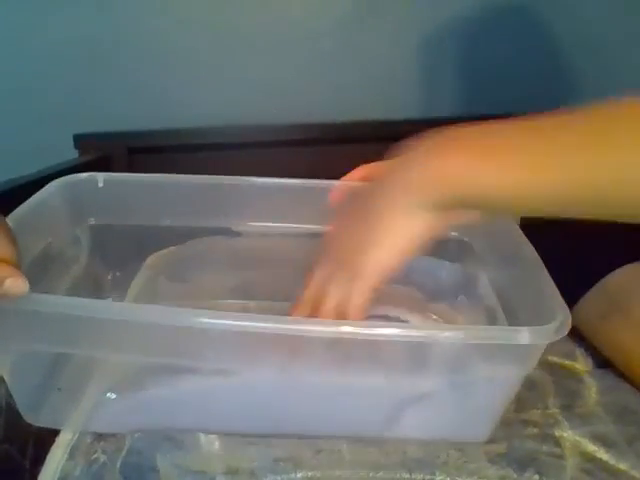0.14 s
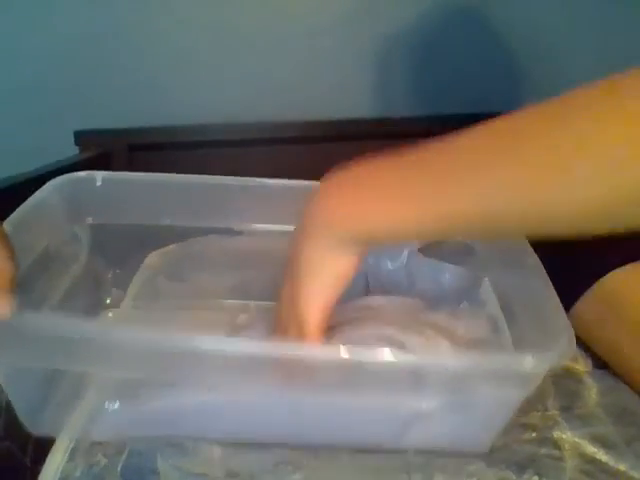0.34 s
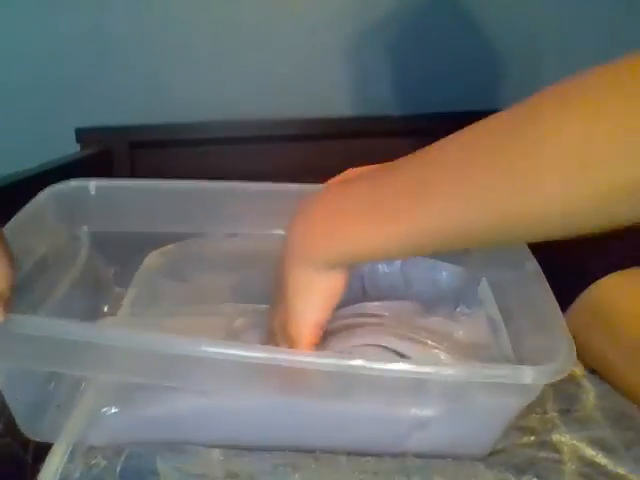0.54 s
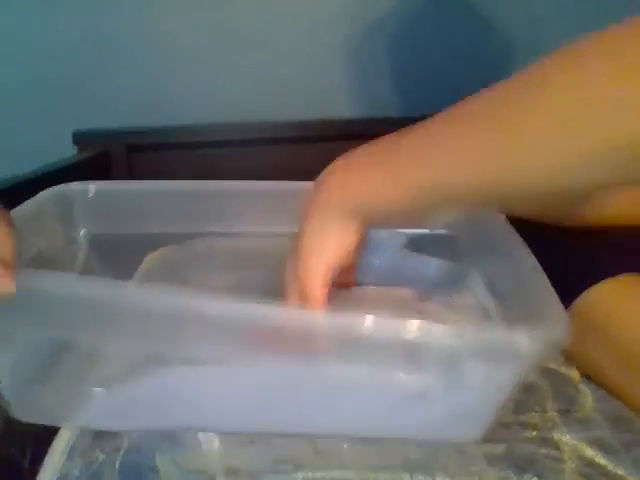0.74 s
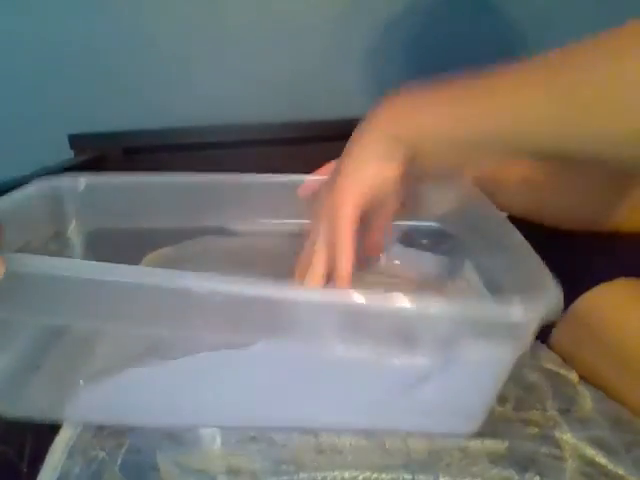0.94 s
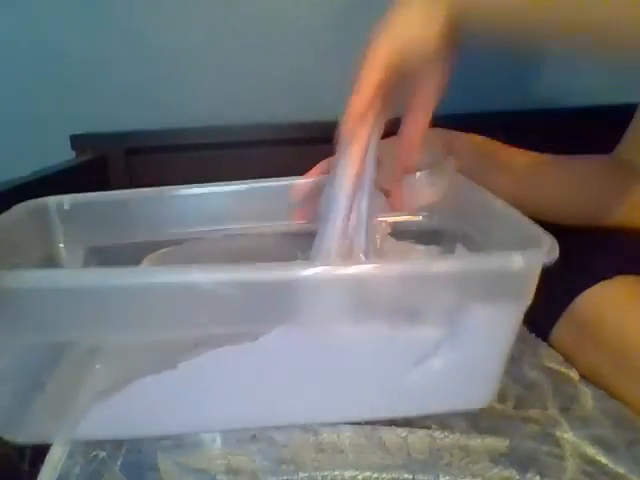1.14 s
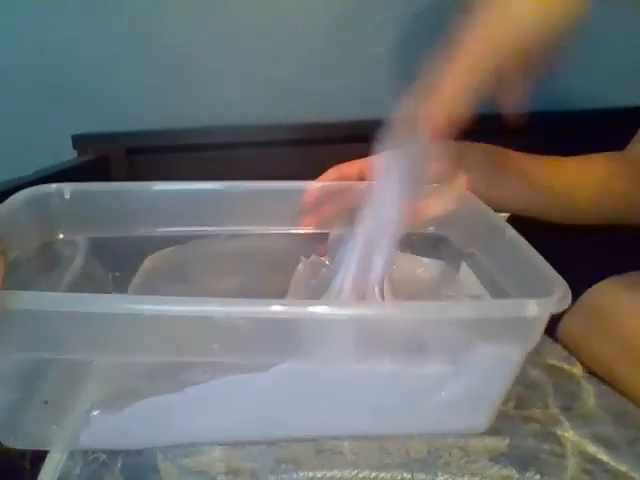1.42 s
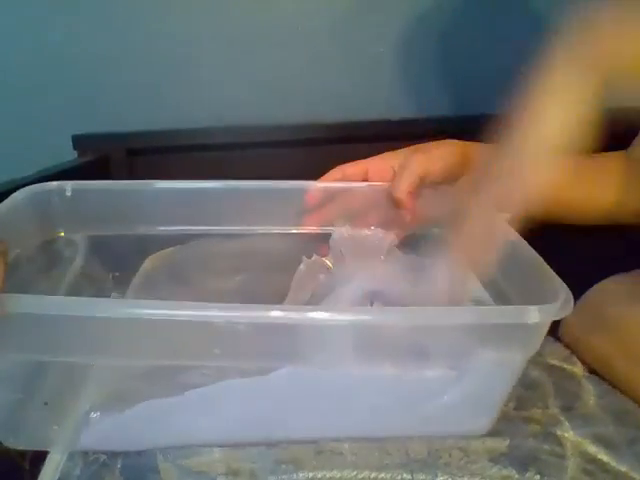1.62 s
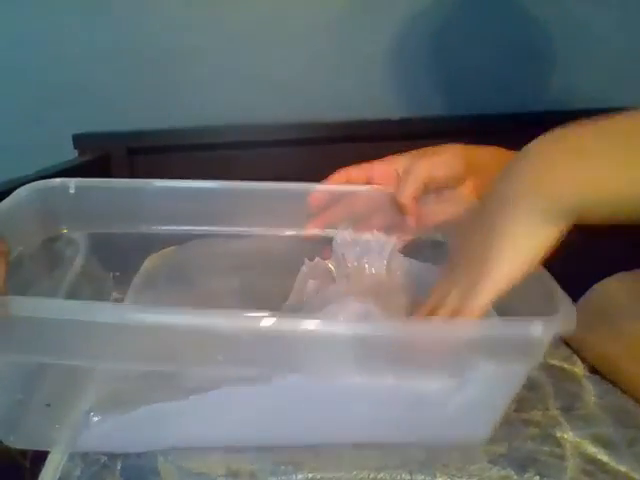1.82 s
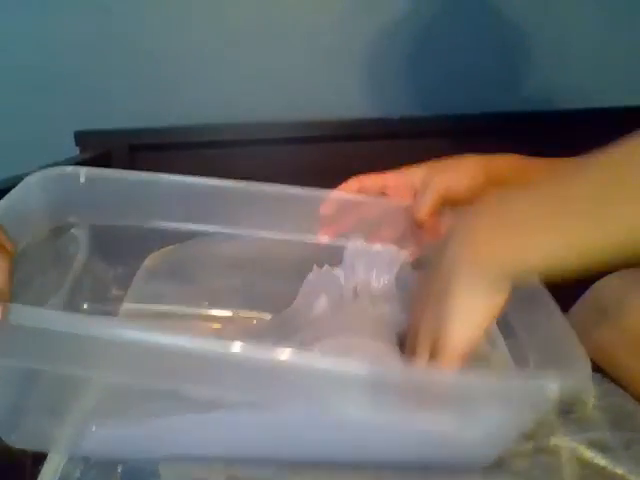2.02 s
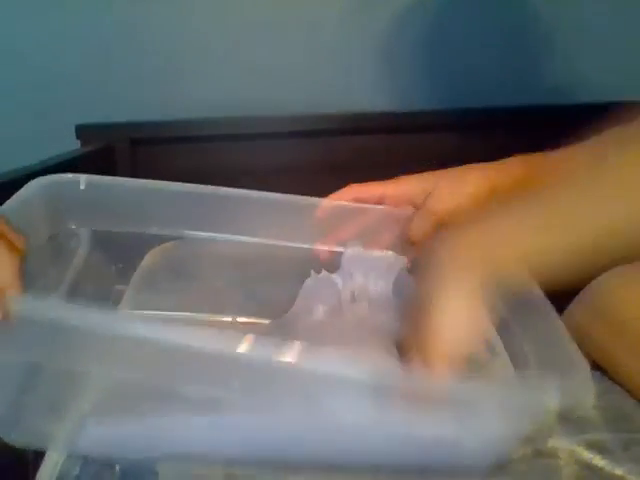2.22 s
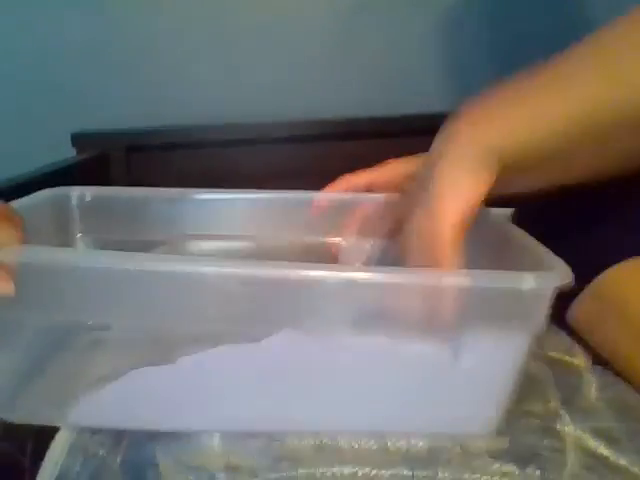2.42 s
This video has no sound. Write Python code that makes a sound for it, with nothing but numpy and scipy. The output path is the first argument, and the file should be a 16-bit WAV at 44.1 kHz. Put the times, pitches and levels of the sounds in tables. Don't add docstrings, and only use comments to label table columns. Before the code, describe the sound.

Slime is kneaded in a plastic tub, close up in a small bedroom. Faint wet crackles and little pops come first, with squelching around 0.7 s. Sharp snaps and hollow pops burst at 0.98 and 1.04 s. It then quietens until soft squelches near 2.1 s and loud snapping clusters at 2.4 to 2.5 s. Dull knocks, low thuds, rumble and steady hiss run beneath.

```python
import sys
import numpy as np
from scipy import signal
from scipy.fft import rfft, irfft
from scipy.io import wavfile
from scipy.ndimage import uniform_filter1d

SR = 44100
rng = np.random.default_rng(int(sys.argv[2]) if len(sys.argv) > 2 else 0)


def file_out(sig):
    cols = np.atleast_2d(sig).T
    lim = np.clip(cols, -1, 1)
    pcm = np.round(lim * 32767).astype(np.int16)
    wavfile.write(sys.argv[1], SR, pcm)


def level_to_linear(level):
    exponent = np.asarray(level, float) / 20
    return 10 ** exponent


N = 112454


def evened(x):
    return x / np.sqrt(np.mean(x ** 2) + 1e-20)


def coloured_noise(points):
    hz, db = np.transpose(points)
    f = np.fft.rfftfreq(N, 1 / SR)
    gain = level_to_linear(np.interp(np.log(f + 1), np.log(hz + 1), db))
    return evened(irfft(rfft(rng.standard_normal(N)) * gain, N))


def add(mix, start_s, sound):
    part = mix[round(start_s * SR):][:len(sound)]
    part += sound[:len(part)]


def resonate(x, hz, width_hz):
    turn = np.exp(2j * np.pi * hz * np.arange(len(x)) / SR)
    r = np.exp(-np.pi * width_hz / SR)
    return 2 * (turn * signal.lfilter([1 - r], [1, -r], x / turn)).real


def resonate_twice(x, hz, width_hz):
    return resonate(resonate(x, hz, width_hz), hz, width_hz)


def dying_sines(modes, t, sign=1):
    t = np.maximum(t, 0)
    out = np.zeros(len(t))
    for k, (hz, db, t60_s) in enumerate(modes):
        out += sign ** k * level_to_linear(db - 60 * t / t60_s) * np.sin(2 * np.pi * hz * t)
    return out


def ringing_bodies(table, rough, rise_s):
    wobble_hz = 260
    t, out = np.arange(8192) / SR, np.zeros(N)
    for (start_s, db, hz, ring_ms), noise in zip(table, rng.standard_normal((len(table), 8192))):
        wobble = evened(resonate_twice(noise, hz, wobble_hz))
        tone = np.sin(2 * np.pi * hz * t) + rough * wobble
        decay = level_to_linear(db - 60 * t / (ring_ms / 1000))
        add(out, start_s, (1 - np.exp(-t / rise_s)) * decay * tone)
    return out


# (frequency [Hz], density [dB per Hz])
HISS_SPECTRUM = [(88, -54), (150, 7.5), (1480, -5.5), (1830, -4), (2180, -5.5), (5910, -11.5),
                 (13400, -7.5), (16000, -4)]


def microphone_hiss():
    return level_to_linear(-52.5) * coloured_noise(HISS_SPECTRUM)


# (time [s], signed pressure [full scale], width [s])
BED_SWAYS = [(.37, -0.026, .02), (.55, -0.026, 0.034), (.65, 0.023, 0.021), (0.829, 0.029, 0.046),
             (1.16, -0.025, 0.017), (1.782, -0.015, 0.026), (1.85, 0.033, 0.029), (1.97, -0.032, 0.025),
             (2.152, -.035, 0.012), (2.221, 0.049, 0.015), (2.397, 0.049, 0.021), (2.44, -0.072, 0.032),
             (2.545, 0.044, 0.015)]
# (frequency [Hz], level [dB])
RUMBLE_SPECTRUM = [(4, -5.5), (8, -2), (16, -9), (35, -21.5), (70, -24.5), (110, -27.5), (200, -38.5),
                   (400, -50)]


def bedding():
    t = np.arange(N) / SR
    bumps = np.zeros(N)
    for peak_s, pressure, width_s in BED_SWAYS:
        bumps += pressure * np.exp(-((t - peak_s) / width_s) ** 2)
    return bumps + level_to_linear(-40) * coloured_noise(RUMBLE_SPECTRUM)


# (time [s], level [dB], pitch [Hz], ring [ms])
TUB_THUDS = [
    (.25, -34.5, 93, 105),
    (.51, -45.5, 250, 60),
    (.79, -30.5, 111, 100),
    (.83, -39, 68.5, 130),
    (1.85, -39.5, 89, 180),
    (2.19, -31, 93.5, 180),
    (2.372, -29.5, 111, 120),
    (2.33, -34, 243, 73),
]


def tub_thuds():
    return ringing_bodies(TUB_THUDS, rough=0.28, rise_s=0.0076)


# (time [s], level [dB])
JOINT_SLIPS = [
    (0.1529, 0),
    (0.6053, -.5),
    (.739, 1),
    (0.9287, 1),
    (1.3621, -.5),
    (2.2783, 1),
    (2.4759, -1),
]
# (frequency [Hz], level [dB], t60 [s])
JOINT_TICK_MODES = [(9170, -32, 0.0082), (6020, -35, 0.0079), (4800, -24, 0.0015), (3340, -19.5, 0.001),
                    (2620, -33.5, 0.0071), (1500, -28, 0.0038), (12000, -34, 0.0059), (14500, -34, 0.0027)]
# (frequency [Hz], level [dB], t60 [s])
RECORDER_CASE_MODES = [(203.4, -29, 0.068), (678, -37.5, 0.06), (2020, -35, 0.014), (315, -27.5, 0.026)]


def joint_knocks():
    lead_s = 0.15
    push_delay_s, push_rise_s, push_hold_s, push_fall_s = 0.001418, 0.001, 0.0014, 0.00061
    load_s, settle_s = 0.037, 0.028
    t = np.arange(-lead_s, 0.2, 1 / SR)
    since_push = t - push_delay_s
    rise = np.sin(np.pi / 2 * np.clip(since_push / push_rise_s, 0, 1)) ** 2
    since_hold = np.maximum(since_push - push_rise_s - push_hold_s, 0)
    push = level_to_linear(-19) * rise * np.exp(-since_hold / push_fall_s)
    load = -level_to_linear(-33.5) * (1 - rise) * np.exp(np.minimum(since_push, 0) / load_s)
    settle = level_to_linear(-38) * rise * np.exp(-np.maximum(since_push, 0) / settle_s)
    tick = dying_sines(JOINT_TICK_MODES, t, sign=-1.052)
    case = dying_sines(RECORDER_CASE_MODES, since_push)
    knock = tick + case + push + load + settle
    out = np.zeros(N)
    for slip_s, db in JOINT_SLIPS:
        add(out, slip_s - lead_s, level_to_linear(db) * knock)
    return out


# (frequency [Hz], width [Hz], level [dB])
TUB_RESONANCES = [(1600, 960, -1.5), (2180, 670, -5), (3900, 610, 0), (11500, 4000, -12)]


def room(x):
    t60_s = 0.19
    taps = np.zeros(SR // 2)
    at = np.arange(100, len(taps) - 20, 20)
    taps[at + rng.integers(0, 20, len(at))] = rng.choice([-1., 1.], len(at))
    tail = level_to_linear(3) * taps
    for hz, width_hz, db in TUB_RESONANCES:
        tail += 2 * level_to_linear(db) * resonate(taps, hz, width_hz)
    tail = tail * level_to_linear(-60 * np.arange(len(taps)) / SR / t60_s)
    return level_to_linear(-16) * signal.fftconvolve(x, tail / np.linalg.norm(tail))[:N]


def wet_grains():
    grains_per_s, spread_db, ooze, clump_db = 2600, 4, 0.9, 1.7
    size = level_to_linear(spread_db * np.minimum(rng.exponential(1, N), 4))
    clicks = size * (rng.random(N) < grains_per_s / SR) * rng.choice([-1., 1.], N)
    clumps = evened(uniform_filter1d(rng.standard_normal(N), size=200))
    return (evened(clicks) + ooze * rng.standard_normal(N)) * level_to_linear(clump_db * clumps)


# (peak time [s], level [dB], rise [s], fall [s], centre [Hz])
SLIME_SQUEEZES = [(.3, -58, 0.12, 0.14, 1400), (0.678, -47.5, 0.03, 0.071, 470),
                  (.69, -45, 0.049, 0.079, 1370), (0.683, -46, 0.026, 0.064, 5700),
                  (0.83, -48.5, 0.05, 0.055, 3300), (0.762, -51.5, 0.047, 0.14, 560),
                  (2.28, -51, .1, .12, 1100), (.995, -46, .01, .025, 2000), (1.039, -25, 0.006, .009, 4600),
                  (1.031, -33, .005, .003, 4800), (.985, -36, .004, .012, 9000), (.7, -51, .04, .12, 12500),
                  (2.235, -49, .02, .03, 12500), (.85, -53, .04, .04, 1400), (2.33, -49, .03, .03, 500),
                  (.5, -56, .05, .05, 520), (.99, -50, .02, .03, 380), (2.505, -38, .015, .025, 13000),
                  (1.042, -19.5, 0.0086, .004, 18000), (1.075, -47, 0.02, 0.04, 4500),
                  (1.065, -45, 0.012, 0.05, 2000), (1.87, -54, 0.027, 0.045, 570),
                  (2.14, -46, 0.045, 0.05, 3300), (2.133, -46.5, 0.052, 0.079, 650),
                  (2.26, -50, .03, .03, 4500), (2.39, -48.5, 0.056, .03, 3200),
                  (2.407, -24, .004, .013, 6500), (2.426, -25, 0.011, 0.013, 2900),
                  (2.425, -32, 0.012, 0.014, 900), (2.481, -21, .004, .005, 14500),
                  (2.5, -42, 0.02, 0.04, 2000), (2.45, -40, .03, .04, 7500)]


def crackle():
    width = 1.794
    grains = wet_grains()
    t, out = np.arange(N) / SR, np.zeros(N)
    for k, (peak_s, db, rise_s, fall_s, hz) in enumerate(SLIME_SQUEEZES):
        edges = [hz / width, min(hz * width, SR * 0.45)]
        band = signal.butter(2, edges, "band", fs=SR, output="sos")
        swell = np.exp(-((t - peak_s) / np.where(t < peak_s, rise_s, fall_s)) ** 2)
        own_grains = np.roll(grains, 4000 * k)
        out += level_to_linear(db) * swell * evened(signal.sosfilt(band, own_grains))
    return out


# (time [s], level [dB], pitch [Hz], ring [ms])
AIR_POCKETS = [(.305, -47, 1613, 90), (.388, -35, 695, 15), (.256, -50.5, 1600, 220),
               (.5215, -38, 1250, 13), (.49, -42, 700, 25), (.525, -41, 630, 16), (.6243, -27.5, 423, 13),
               (.9797, -20, 1210, 22), (.9835, -21, 640, 16), (1.0355, -11, 1230, 22),
               (1.0405, -4, 1440, 15), (1.0425, -13, 2240, 20), (1.052, -26, 1890, 37),
               (2.076, -36, 1734, 35), (2.4805, -8, 3050, 13), (2.1221, -30, 1752, 41),
               (2.128, -36, 630, 20), (2.1551, -30, 1700, 12), (2.169, -33, 1500, 13),
               (2.327, -42, 1250, 14), (2.411, -16, 435, 50), (2.4235, -18, 2750, 12),
               (2.4238, -13, 1420, 13), (2.425, -9, 2250, 15), (2.4315, -14.5, 1340, 14),
               (2.431, -17, 620, 16), (2.4808, -7.5, 1255, 34), (2.4805, -11, 680, 18),
               (2.506, -29, 1170, 45), (2.5306, -23, 1213, 45), (.9797, -26, 2470, 14),
               (.9805, -22, 3150, 14), (.9797, -22, 4950, 14), (.9797, -19, 880, 22),
               (.9905, -35, 2150, 22), (.984, -26, 2800, 10), (1.018, -39, 1000, 20),
               (1.0352, -13, 4120, 18), (1.0355, -14, 2250, 16), (1.041, -21, 4650, 14),
               (1.041, -15, 3850, 14), (2.4315, -11, 1790, 14), (2.4315, -14, 2820, 10),
               (2.445, -24, 2200, 16), (2.454, -28, 1400, 14), (2.4808, -14, 2250, 14),
               (2.4945, -25, 2400, 18), (2.509, -26, 2350, 14), (2.523, -28, 1250, 18),
               (2.406, -18, 4500, 12)]


def pops():
    return ringing_bodies(AIR_POCKETS, rough=0.35, rise_s=0.0009)


# (time [s], level [dB], centre [Hz], decay [ms])
FILM_SNAPS = [(.806, -28, 4000, 1.5), (.2505, -28, 8750, 2.1), (.266, -35.5, 6000, 1.2),
              (.5215, -35, 9050, 0.92), (.6242, -25, 3500, 0.45), (.8057, -24, 8500, 1.2),
              (.975, -27, 12000, 2.8), (.9801, -12, 11000, 1.8), (.9835, -22, 5800, 2),
              (.9906, -31, 7000, 1.1), (1.0302, -23, 13000, .9), (1.0322, -3, 13300, .5),
              (1.0357, -2, 13400, .6), (1.0372, -13, 6200, 1.3), (1.0408, 0, 14000, 1.1),
              (1.619, -37, 11000, 1.4), (1.7953, -30, 11200, 1.3), (2.0223, -56, 11000, .9),
              (2.1575, -20, 9800, .9), (2.4025, -24, 9000, 4), (2.4067, 0, 10200, 1.05),
              (2.408, -3, 7600, 2.4), (2.413, -15, 14000, 2.5), (2.416, -16, 6000, 2.8),
              (2.4316, -9, 3600, 1), (2.4803, -7, 12700, 3.7), (2.4808, -14, 4300, 2.5),
              (2.4838, -9, 12000, 1.8), (.975, -27, 2800, 3), (.981, -18, 8800, 2.5),
              (.9845, -24, 13500, 1.5), (1.037, -3, 14500, 1.2), (1.0432, -13, 12500, 1.5),
              (2.4067, -6, 13200, 1), (2.4067, -9, 5800, 1.2), (2.4095, -7, 7000, 1.6),
              (2.424, -22, 14500, 1.5), (2.4315, -24, 10500, 1), (2.4793, -10, 14000, 1),
              (2.489, -22, 12500, 3), (.788, -34, 4000, 3), (2.096, -36, 3000, 2), (2.22, -33, 12000, 3),
              (2.15, -35, 14000, 4), (.675, -36, 9500, 2), (.7, -36, 7000, 2), (2.024, -36, 13500, 1.5)]


def snaps():
    t, out = np.arange(1024) / SR, np.zeros(N)
    for (start_s, db, hz, decay_ms), noise in zip(FILM_SNAPS, rng.standard_normal((len(FILM_SNAPS), 1024))):
        burst = evened(resonate_twice(noise, hz, 0.4 * hz)) + level_to_linear(-21) * noise
        add(out, start_s, level_to_linear(db - 6) * np.exp(-t / (decay_ms / 1000)) * burst)
    thin = signal.butter(2, 1100, "high", fs=SR, output="sos")
    return signal.sosfilt(thin, out)


def scene():
    slime = snaps() + pops() + crackle()
    handling = joint_knocks() + bedding() + tub_thuds()
    return (slime + room(slime) + handling + microphone_hiss())[None]


def low_pass(x):
    return signal.sosfilt(signal.butter(12, 17000, fs=SR, output="sos"), x)


def record(dry):
    ceiling = 0.85
    limited = ceiling * np.tanh(dry / ceiling)
    edge = signal.firwin(255, 15950, window=("kaiser", 8), fs=SR)
    mix = signal.oaconvolve(limited, edge[None], "same")
    return low_pass(mix)


dry = scene()
out = record(dry)
file_out(out)
```